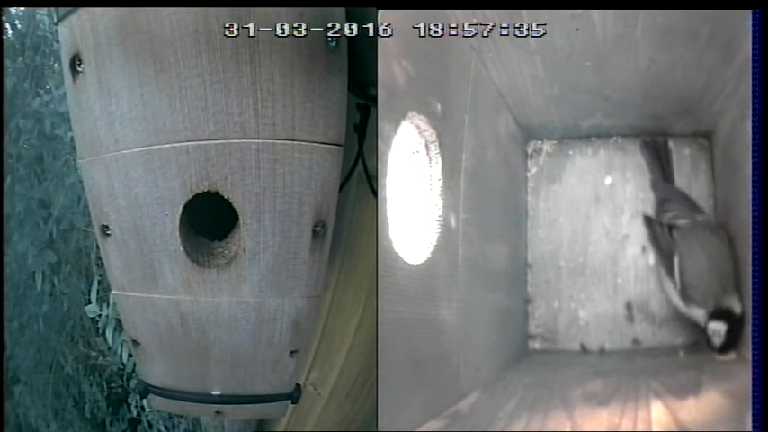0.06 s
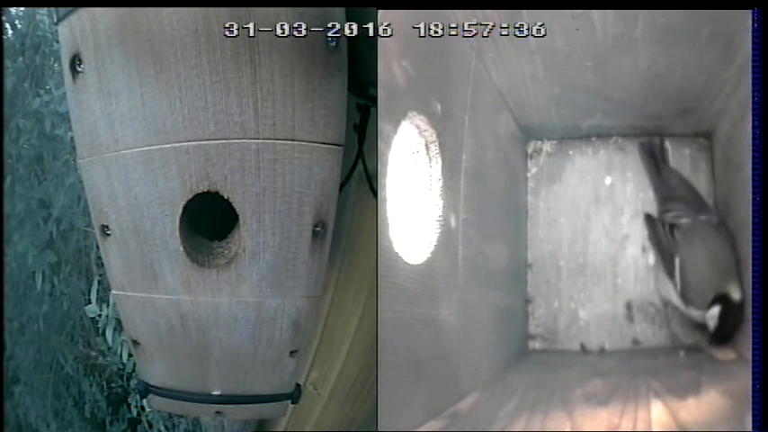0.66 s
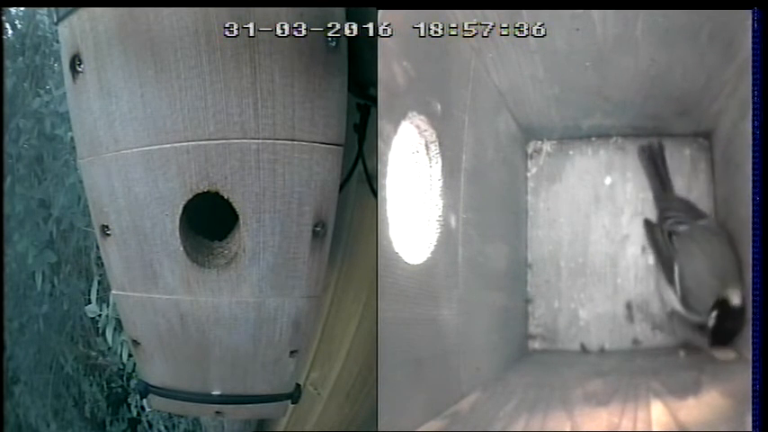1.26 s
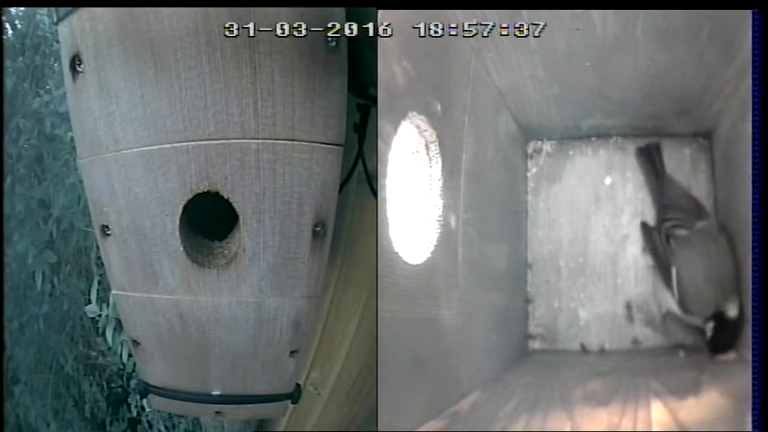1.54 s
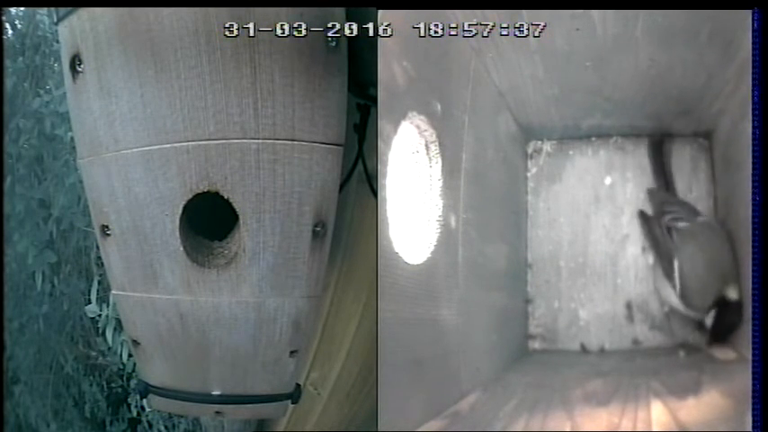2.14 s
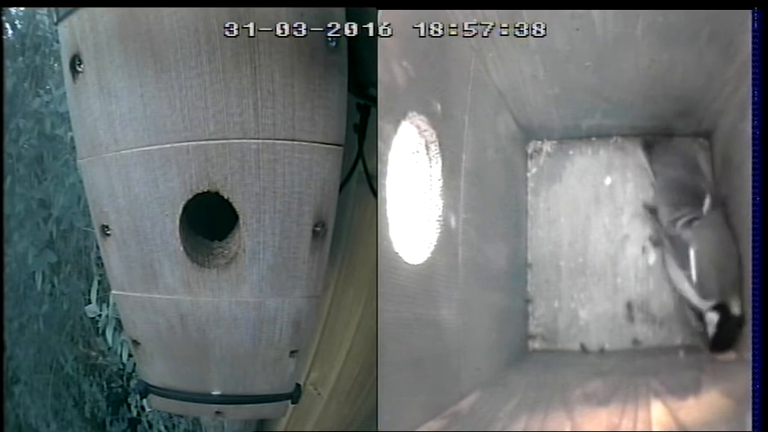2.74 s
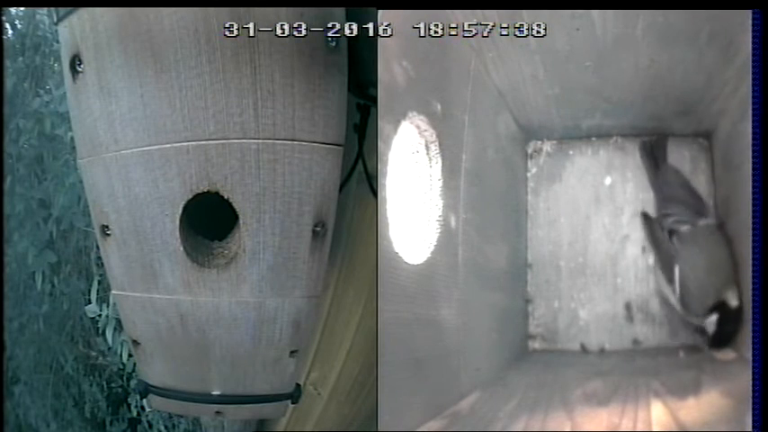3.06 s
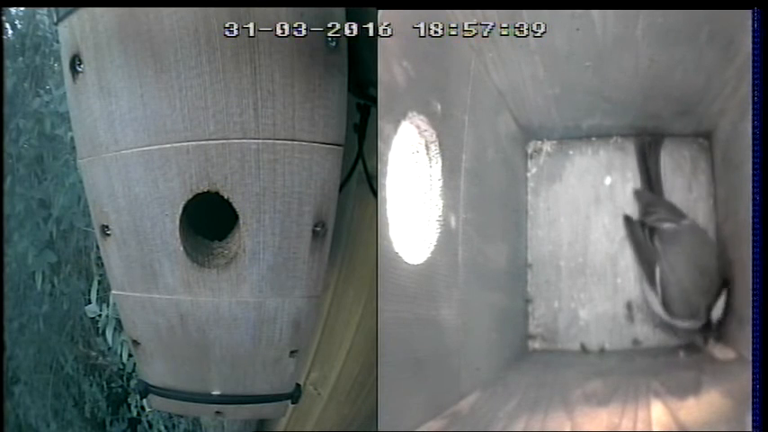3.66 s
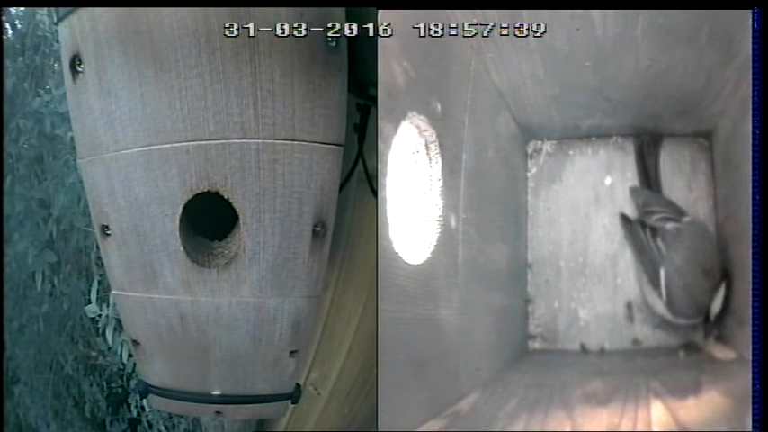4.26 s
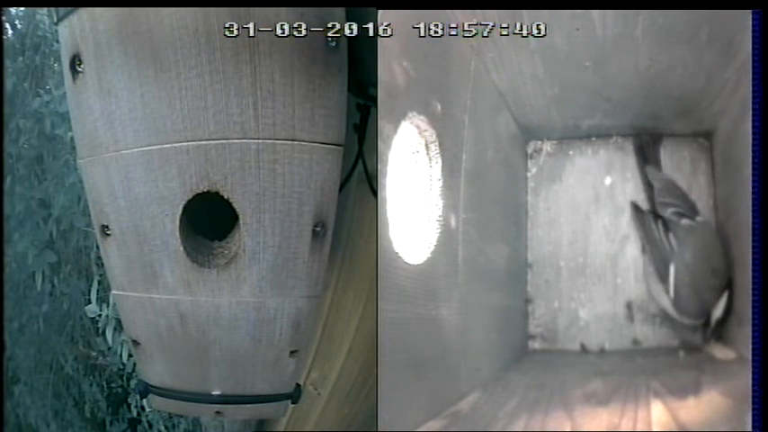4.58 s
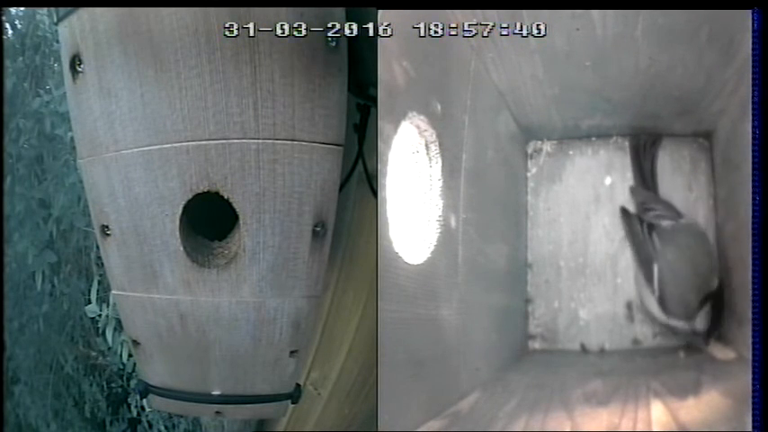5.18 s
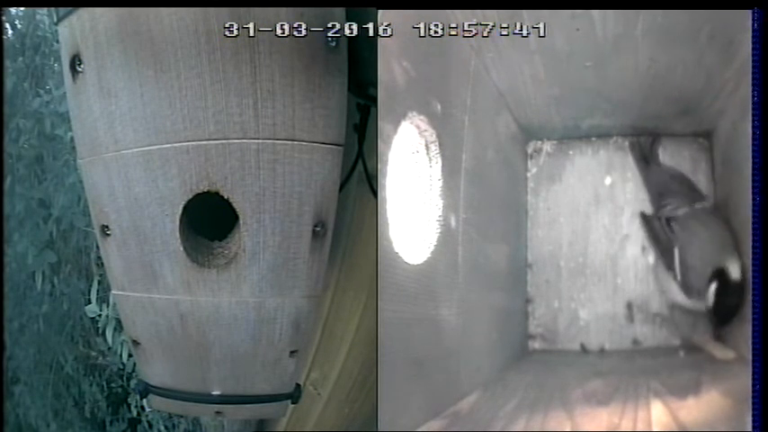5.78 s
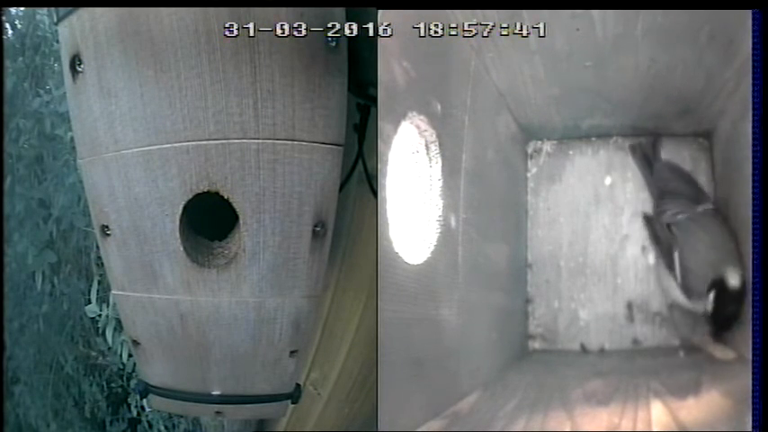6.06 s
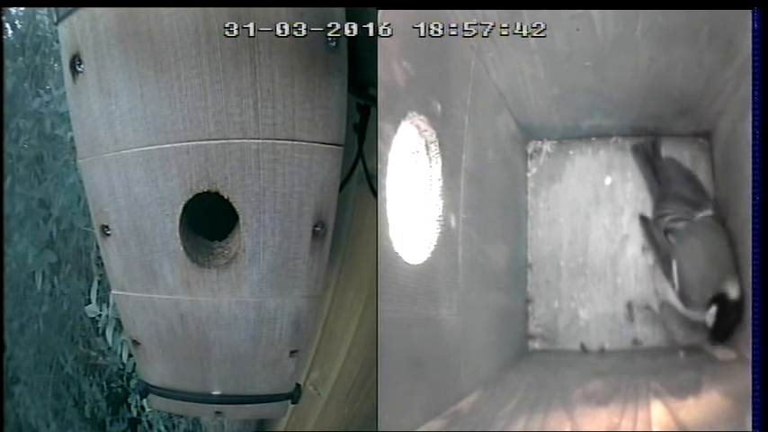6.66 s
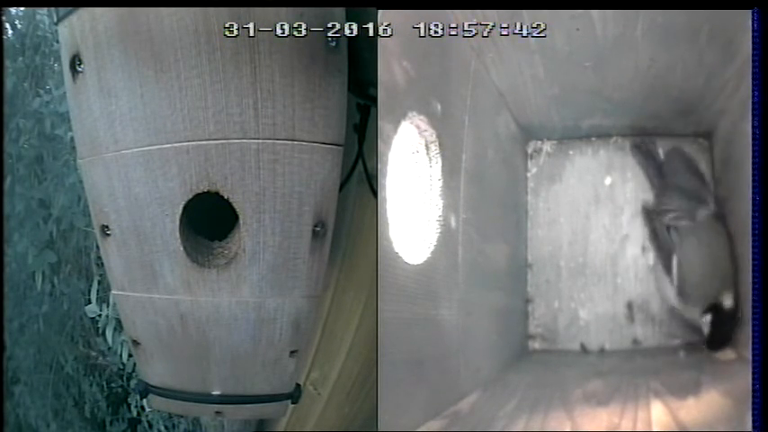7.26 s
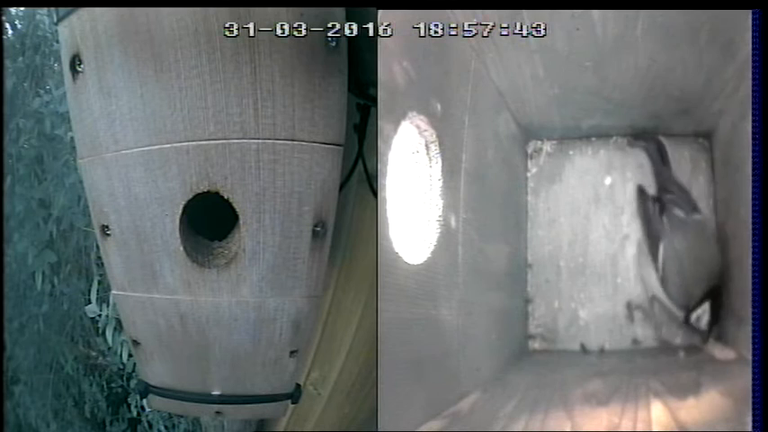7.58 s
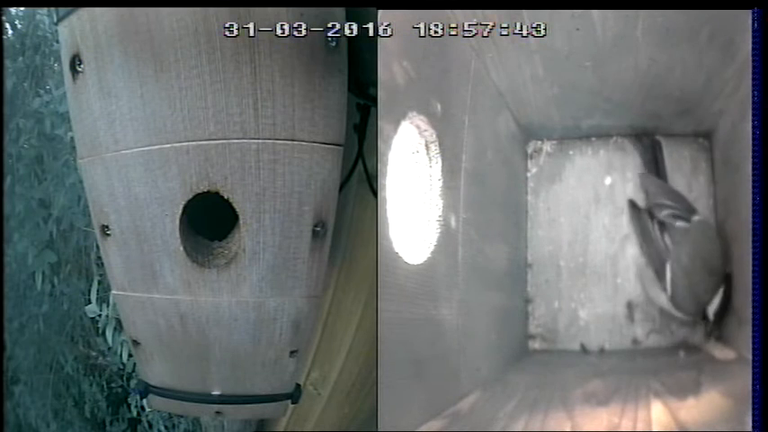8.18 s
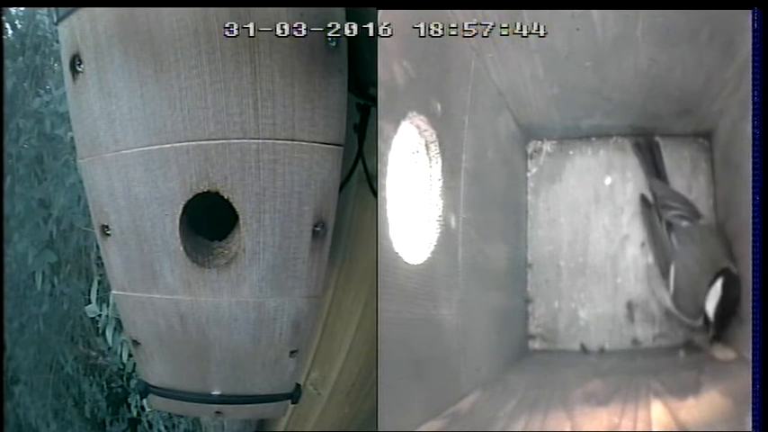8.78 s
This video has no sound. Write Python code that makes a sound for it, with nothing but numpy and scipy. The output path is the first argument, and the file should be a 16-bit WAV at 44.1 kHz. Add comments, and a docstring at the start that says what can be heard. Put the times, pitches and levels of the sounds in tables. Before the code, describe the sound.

A small bird shuffles inside a wooden nest box, heard very close. Its feet and bill make short hollow knocks and sharp taps, each with a soft claw scrape or feather brush. Scattered knocks start at once and build to a strong cluster from about 1.9 to 2.7 seconds. Far outside, another bird faintly repeats a two-note phrase four times between 1.2 and 2.7 seconds. From 3 to 5.5 seconds there are only light ticks and rustles, three faint pips around 4 seconds and one sharper tap at 4.7. The loudest run of knocks comes from 5.6 to 7 seconds, the hardest slightly overloading the microphone. Lighter taps and brushing follow until 8.5 seconds, and the distant song returns twice from 8.2 seconds. Throughout, a low outdoor rumble hums in the hollow box, with faint electrical hiss, buzz and a thin, very high whistle.

```python
"""A small tit shuffles in a wooden nest box: its bill and feet knock on the boards, its claws scrape
and its feathers brush the wall. Outdoor noise hums in the hollow box, another tit sings far outside,
and three faint pips sound while the bird rests. The little camera inside overloads on the hardest
knocks and adds its own hiss, buzz and high whistle."""
import sys
import numpy as np
from scipy import signal
from scipy.fft import rfft, irfft, next_fast_len
from scipy.io import wavfile
from scipy.ndimage import uniform_filter1d, map_coordinates

SR = 44100
rng = np.random.default_rng(int(sys.argv[2]) if len(sys.argv) > 2 else 0)


def master(y):
    """Save y as 16-bit WAV."""
    cut = np.clip(np.atleast_2d(y).T, -1, 1)
    pcm = np.round(cut * 32767)  # scale
    wavfile.write(sys.argv[1], SR, pcm.astype(np.int16))


N = 393372

# Shoves of the bird's whole body. Each row: time of the knock in seconds, its strength in dB,
# hardness from 0 (padded) to 1 (claw tip), rustle strength in dB.
BODY_SHOVES = [(-.045, -9, .2, -60), (0.865, -8.5, 0.22, -50.5), (1.332, -15, .24, -53.5),
               (1.914, -11.5, 0.17, -49.5), (2.282, -8, .12, -51), (2.649, -5, .27, -47),
               (5.581, -17, 0.1, -53), (5.84, -6, 0.23, -54), (6.118, -4, 0.47, -50.5),
               (6.391, -4.5, 0, -47.5), (6.752, -7, 0.28, -48), (7.202, -22, 0.26, -51.5)]
# Single taps of feet and bill. Each row: start in seconds, strength in dB, hardness from 0 to 1.
TAPS = [(.214, -38, .9), (.228, -19, .72), (.416, -32.5, 0.38), (.493, -22.5, 0.8), (.691, -63, 1),
        (1.144, -46, 0.15), (1.419, -38.5, 0.3), (1.681, -20.5, .8), (1.956, -17.5, .65), (2.38, -15, 0.7),
        (2.686, -15, 0.8), (2.707, -18.5, .7), (2.917, -34, 0), (3.002, -35.5, 0), (3.188, -38, 0.9),
        (3.434, -41.5, .42), (3.715, -43.5, 0), (3.754, -45.5, .95), (4.432, -43, 0.3), (4.595, -44, 0.1),
        (4.702, -18.5, 0.88), (4.926, -37.5, .55), (5.066, -45.5, 0.94), (5.39, -59, .95),
        (5.603, -28.5, 0.7), (5.912, -21.5, .82), (6.165, -19.5, .8), (6.511, -29, 0.5),
        (6.536, -39.5, 0.94), (6.998, -23, 0.96), (7.299, -39, 0.4), (7.356, -44, 1), (7.749, -35, 0),
        (7.774, -33.5, 0.85), (7.932, -58, .95), (8.214, -29, 0.52), (8.271, -39.5, 0), (8.314, -38.5, .35),
        (8.409, -36.5, 0.7), (8.44, -39, .4)]


def amp(db):
    """Turn decibels into a number to multiply by."""
    return 10 ** (np.asarray(db) / 20)


def unit(x):
    """Scale a sound to an average (rms) level of 1."""
    return x / np.sqrt(np.mean(x ** 2) + 1e-20)


def clock():
    """The time of every sample in seconds."""
    return np.arange(N) / SR


def wobble(rate):
    """A smooth curve through `rate` random points a second."""
    return map_coordinates(rng.standard_normal(int(N * rate / SR) + 4), [np.arange(N) * rate / SR])


def filtered(x, response):
    """Multiply each frequency in a sound by response(hz)."""
    size = next_fast_len(len(x) + 8192)
    return irfft(rfft(x, size) * response(np.fft.rfftfreq(size, 1 / SR)), size)[:len(x)]


def coloured(x, points):
    """Shape a sound's tone along (Hz, dB) points, then scale it to level 1."""
    point_hz, db = np.transpose(points)
    return unit(filtered(x, lambda hz: amp(np.interp(np.log(hz + 1), np.log(point_hz), db))))


def ringing(modes, t, scatter_db, detune):
    """One fading sine for each natural tone of the wood; its strength depends on where the blow lands."""
    hz, db, t60 = np.transpose(modes)  # t60: seconds to fade by 60 dB
    size, pitch = rng.standard_normal((2, len(hz)))
    gain = (-1) ** np.arange(len(hz)) * amp(db + scatter_db * size)  # neighbours swing opposite ways
    sines = np.sin(2 * np.pi * np.outer(hz * (1 + detune * pitch), t))
    return gain[:, None] * amp(-60 * t / t60[:, None]) * sines


def box_ring(scatter_db=2, thud_hz=1250, crack_db=-7, crack_t60=0.032):
    """The struck box rings in three parts: floor thud, board clack and sharp edge."""
    # Tones of floor and walls. Each row: pitch in Hz, level in dB, seconds to fade by 60 dB.
    board_tones = [(538.6, -15, 0.029), (609.4, -8.5, 0.05), (678.2, -12, 0.049), (853.2, 0, 0.066),
                   (992, -14.5, 0.057), (1126.5, -19.5, 0.061), (1192, -22.5, 0.079), (1296, -8, 0.04),
                   (1618, -23, 0.065), (1695, -18, 0.03), (1794, -15.5, 0.024), (2024, -16.5, 0.055),
                   (2360, -15.5, 0.03), (2523, -19.5, 0.057), (3024, -0.5, 0.03), (3245, -6.5, 0.038),
                   (3363, -3, 0.034), (3513, -4.5, 0.022), (3800, -11.5, .033), (4339, -17.5, .029),
                   (5150, -20, 0.039), (5343, -8, 0.022), (5592, -5, 0.022), (6060, -10.5, 0.013),
                   (6657, -3, .018), (6960, -15, 0.031)]
    # The boards' crowded high tones, made from noise. Each row: frequency in Hz, level in dB.
    crack_colour = [(3000, -29.5), (5000, -0.5), (6800, 7.5), (7400, -11.5), (8800, 4), (10300, -2.5),
                    (12000, -6.5), (14000, -10), (17000, -23.5)]
    t = np.arange(SR // 10) / SR
    tones = ringing(board_tones, t, scatter_db, detune=0.0067)
    hz = np.transpose(board_tones)[0]
    thud = 1 / (1 + (hz / thud_hz) ** 6) @ tones  # a blunt push reaches only the low tones
    band = np.digitize(hz, [1100, 4600])
    clack, edge = tones[band == 1].sum(0), tones[band == 2].sum(0)
    crack = coloured(rng.standard_normal(len(t)), crack_colour) * amp(-60 * t / crack_t60)
    edge = unit(edge) + amp(crack_db) * unit(crack)
    rise_s = np.array([[0.003], [0.0008], [0.00041]])  # low tones take longer to build up
    parts = np.array([thud, clack, edge]) * (1 - np.exp(-t / rise_s))
    # each part gets level 1 over its first 10 ms
    return parts / np.sqrt(np.mean(parts[:, :SR // 100] ** 2, axis=1, keepdims=True))


def knocks(skid=0.6, skid_s=0.0029, thud_db=0.5, rock_db=-17, rock_growth=0.67, rock_rise_s=0.00045):
    """Each blow is a sharp hit with a brief skid; it rings the boards and rocks the whole box."""
    # How soft and hard blows divide up. Each row: hardness from 0 to 1, then thud, clack and edge in dB.
    contacts = [(0, -2, -15.5, -38), (.35, -1, -9.5, -18.5), (.7, -6.5, 1, -10.5), (1, -6, -0.5, 2.5)]
    # The box rocking on its mount. Each row: pitch in Hz, level in dB, seconds to fade by 60 dB.
    rocking_tones = [(135, -7.5, 0.079), (154.8, 5, .16), (239, -10, 0.097), (360, -8, 0.25)]
    hardness_points, *shares = np.transpose(contacts)
    out, t = np.zeros(N), np.arange(SR // 4) / SR
    contact_t = t[:SR // 100]
    for start, db, hardness, *_ in BODY_SHOVES + TAPS:
        thud_level, clack_level, edge_level = [db + np.interp(hardness, hardness_points, share)
                                               for share in shares]
        force = rng.standard_normal(len(contact_t)) * np.exp(-contact_t / skid_s)
        force *= skid / np.linalg.norm(force)
        force[0] += 1  # the hit itself
        thud, *bright = box_ring()
        # the skid colours the high tones anew on every blow
        clack, edge = [unit(signal.fftconvolve(part, force)[:len(part)]) * part.std() for part in bright]
        add(out, start, amp(thud_level + thud_db) * thud + amp(clack_level) * clack
            + amp(edge_level) * edge)
        rocking = ringing(rocking_tones, t, scatter_db=2.5, detune=0.015).sum(0)
        rocking *= 1 - np.exp(-t / rock_rise_s)
        # even soft steps carry the bird's weight, so the rocking grows more slowly than the thud
        add(out, start, amp(rock_db + rock_growth * thud_level) * rocking)
    return out


def add(track, start, sound):
    """Mix a sound into the track at `start` seconds; anything before time zero is cut off."""
    first = round(start * SR)
    part, rest = track[max(0, first):], sound[max(0, -first):]
    part[:len(rest)] += rest[:len(part)]


def strokes(sweep_rise_share=0.14, slide_delay_s=0.091):
    """List every rub: its peak time, rise and fall in seconds, then claw and feather strength in dB."""
    # Sweeps of tail and wing. Each row: peak time and length in seconds, claws and feathers in dB.
    sweeps = [(.01, 0.23, -57, -59.5), (.985, .15, -60, -65), (1.556, 0.2, -53, -60.5),
              (3.085, 0.13, -49.5, -58), (3.523, .15, -56, -67), (3.71, 0.027, -71, -64.5),
              (4.47, 0.054, -58, -61), (5.104, 0.081, -46.5, -68), (6.972, .08, -44, -71),
              (7.408, 0.12, -48.5, -49), (7.506, 0.23, -62, -63), (7.889, 0.4, -62.5, -64.5)]
    moves = [(peak, sweep_rise_share * length, (1 - sweep_rise_share) * length, claws, feathers)
             for peak, length, claws, feathers in sweeps]
    for time, _, _, db in BODY_SHOVES:
        moves.append((time, 0.065, 0.07, db - 1, db - 6))  # the wind-up peaks on the knock
        moves.append((time + slide_delay_s, 0.037, 0.07, db, db - 5))  # a slide follows
    for time, strength, _ in TAPS:
        db = min(-48 + 0.043 * strength, strength - 9)  # the foot scuffs, more weakly than it taps
        moves.append((time, 0.03, 0.068, db, db - 13.5))
    return moves


def restless(effort, fidget_db=-21.5, swing_db=6, spread_s=0.5):
    """The bird fidgets: a little of each stroke's effort spreads unevenly around it."""
    nearby = np.sqrt(np.abs(uniform_filter1d(effort ** 2, int(spread_s * SR))))
    return effort + nearby * amp(fidget_db + swing_db * wobble(25))


def shuffling(slips_per_s=300, spread_db=5.5, grip_db=3, feather_db=1, flutter_db=3):
    """Claws catch on the grain in tiny slips that ring the box, while feathers slide along the wall."""
    # Feathers rubbing on wood. Each row: frequency in Hz, level in dB.
    feather_colour = [(300, -27), (900, -1), (2400, -11.5), (3100, 8.5), (3600, 13), (4400, -10),
                      (6700, -6.5), (7700, -2), (9300, 3), (12000, -5), (15000, -18)]
    t, claws, feathers = clock(), np.zeros(N), np.zeros(N)
    for peak, rise, fall, claw_level, feather_level in strokes():
        start, end = peak - rise, peak + fall
        span = slice(max(0, int(start * SR)), int(end * SR))
        pressure = np.interp(t[span], [start, peak, end], [0, 1, 0]) ** 1.56
        claws[span] += amp(claw_level) * pressure
        feathers[span] += amp(feather_level) * pressure
    claws, feathers = restless(claws), restless(feathers)
    clicks = (rng.random(N) < slips_per_s / SR) * rng.choice([-1, 1], N)
    slips = unit(clicks * amp(spread_db * np.minimum(rng.exponential(size=N), 4)))
    ring = box_ring(scatter_db=-6.5)
    ring /= np.linalg.norm(ring, axis=1, keepdims=True)
    wood = amp([1, 0.5, -3]) @ ring  # mix of thud, clack and edge
    scratch = signal.fftconvolve(slips * claws * amp(grip_db * wobble(70)), wood)[:N]
    brush_level = feathers * amp(feather_db + flutter_db * wobble(220))
    return scratch + brush_level * coloured(rng.standard_normal(N), feather_colour)


def outdoors(rumble_db=-49.5, rumble_share=0.18, hollow_db=0.5, sway_db=0.3):
    """Distant outdoor noise rumbles through the walls and hums in the hollow of the box."""
    # How the outdoor noise swells and fades. Each row: time in seconds, level in dB.
    loudness = [(0.0, -54), (0.57, -59.5), (1.12, -58.5), (2.16, -51.5), (2.36, -55.5), (4.25, -60.5),
                (5.29, -59), (6.58, -51), (7.7, -63), (8.92, -65)]
    # The rumble through the walls. Each row: frequency in Hz, level in dB.
    rumble_colour = [(20, -13.5), (48, -9), (75, -4.5), (105, -8), (140, 4), (165, -3.5), (210, -11),
                     (300, -19), (450, -36), (1500, -60)]
    # Where the air in the box rings, and the dips between. Each row: frequency in Hz, level in dB.
    hollow_colour = [(300, -30), (470, -18), (595, -3.5), (740, -13), (862, 2), (950, -8), (1120, -16),
                     (1290, -12.5), (1480, -26), (2000, -32.5), (2700, -45), (3350, -17), (3950, -35.5),
                     (5000, -49.5)]
    level = np.interp(clock(), *np.transpose(loudness))
    # the rumble follows the swells of the hum only in part
    swell = rumble_share * (level - level.mean()) + sway_db * wobble(12)
    rumble = amp(rumble_db + swell) * coloured(rng.standard_normal(N), rumble_colour)
    return rumble + amp(level + hollow_db) * coloured(rng.standard_normal(N), hollow_colour)


def camera_noise(hiss_db=-74.5, buzz_db=-71, flicker_db=0.4, scans_per_s=50):
    """The camera's circuits hiss, hum and whistle, and a tick for every picture scan makes a buzz."""
    # Mains hum and the whistle of scanning picture lines. Each row: pitch in Hz, level in dB.
    electric_tones = [(50, -65), (300, -74), (400, -75), (15575, -74), (15625, -44)]
    # The amplifier's hiss. Each row: frequency in Hz, level in dB.
    hiss_colour = [(100, 2.5), (4000, -0.5), (10000, 0), (13000, -5), (15000, -11)]
    t = clock()
    tones = sum(np.sqrt(2) * amp(db) * np.sin(2 * np.pi * hz * t) for hz, db in electric_tones)
    tones *= amp(flicker_db * wobble(280))
    ticks = np.diff(np.floor(t * scans_per_s), prepend=0)
    buzz = coloured(ticks, [(50, 0.5), (1700, -1), (3000, -16), (5000, -13.5),
                            (12000, -21.5), (15000, -26.5)])
    return tones + amp(buzz_db) * buzz + amp(hiss_db) * coloured(rng.standard_normal(N), hiss_colour)


def far_song(chip_rasp=0.05, slur_rasp=0.02, whistle_rasp=0.006, echo_db=-7, echo_t60=0.35):
    """A far tit repeats its phrase, the chip raspy and the whistle clear; trees and walls scatter it."""
    # The two-note phrases. Each row: time in seconds, level in dB.
    phrases = [(1.167, -58), (1.571, -52.5), (1.985, -51.5), (2.401, -52.5), (8.219, -55), (8.641, -50.5)]
    # A thin slur overlaps a falling chip, then a held whistle follows.
    # Each row: seconds from the phrase's time, pitch in Hz, dB added to the phrase's level.
    slur = [(-.026, 5620, -38.5), (-.02, 5135, -11), (-.005, 5060, -14.5), (.02, 5000, -15),
            (.04, 4980, -44)]
    chip = [(0, 3920, -23.5), (.008, 3666, 9.5), (.022, 3485, 4), (.036, 3260, 2.5), (.055, 3200, -6.5),
            (.07, 3123, -30.5)]
    whistle = [(.132, 5360, -23.5), (.139, 4280, -19), (.147, 4090, -6), (.17, 4230, 0), (.205, 4073, -5.5),
               (.235, 4030, -1), (.258, 4060, -18)]
    song, tremble = np.zeros(N), wobble(700)
    for syllable, rasp in ((slur, slur_rasp), (chip, chip_rasp), (whistle, whistle_rasp)):
        times, hz, db = np.transpose(syllable)
        t = np.arange(times[0], times[-1], 1 / SR)
        for start, level in phrases:
            jitter = tremble.take(((start + t) * SR).astype(int), mode="wrap")
            pitch = np.interp(t, times, hz) * (1 + rasp * jitter)
            volume = np.sqrt(2) * amp(level + np.interp(t, times, db))
            add(song, start + times[0], volume * np.sin(2 * np.pi * np.cumsum(pitch) / SR))
    t = np.arange(SR // 2) / SR
    tail = rng.standard_normal(len(t)) * amp(-60 * t / echo_t60)
    return song + amp(echo_db) * signal.fftconvolve(song, tail / np.linalg.norm(tail))[:N]


def pips(length_s=0.034):
    """Short, soft swells of thin, high noise while the bird rests."""
    # The pips. Each row: peak time in seconds, level in dB.
    peaks = [(3.84, -57.5), (3.98, -55.5), (4.262, -49)]
    # Their narrow treble band. Each row: frequency in Hz, level in dB.
    pip_colour = [(2500, -40), (3150, 0.5), (3600, 1), (4400, -35)]
    t, half = clock(), length_s / 2
    swells = sum(amp(db) * np.interp(t, [peak - half, peak, peak + half], [0, 1, 0]) ** 2
                 for peak, db in peaks)
    return swells * coloured(rng.standard_normal(N), pip_colour)


def scene():
    """Everything heard inside the box, on one channel."""
    return (knocks() + shuffling() + far_song() + outdoors() + pips())[None]


def record(dry, upper=0.66, lower=0.93, knee=5, low_hz=60, top_hz=17340):
    """The microphone amplifier squashes peaks unevenly; the camera adds noise and trims lows and highs."""
    sound = dry[0]
    ceiling = np.where(sound > 0, upper, lower)
    squashed = sound / (1 + np.abs(sound / ceiling) ** knee) ** (1 / knee)
    thinned = signal.lfilter(*signal.butter(1, low_hz, "highpass", fs=SR), squashed)
    return filtered(thinned + camera_noise(), lambda hz: hz < top_hz)[None]


dry = scene()
out = record(dry)
master(out)
```